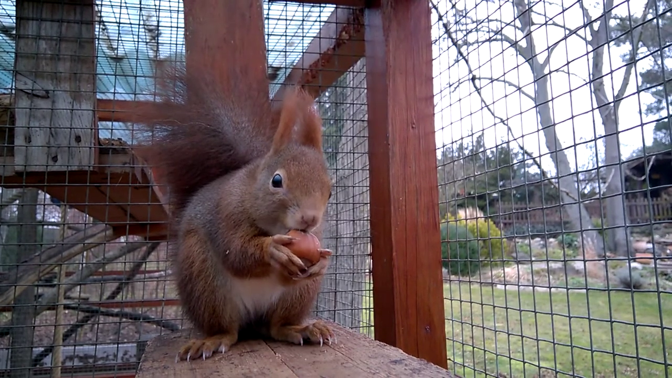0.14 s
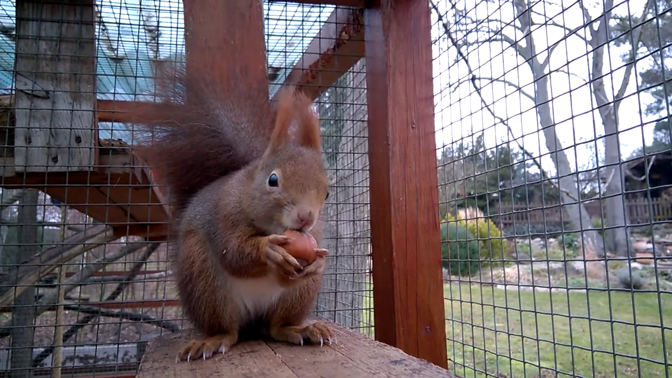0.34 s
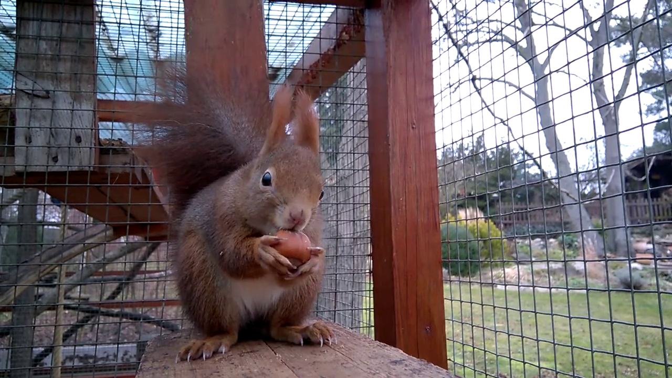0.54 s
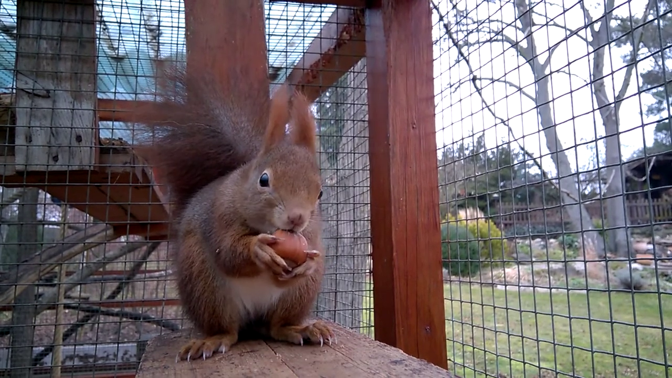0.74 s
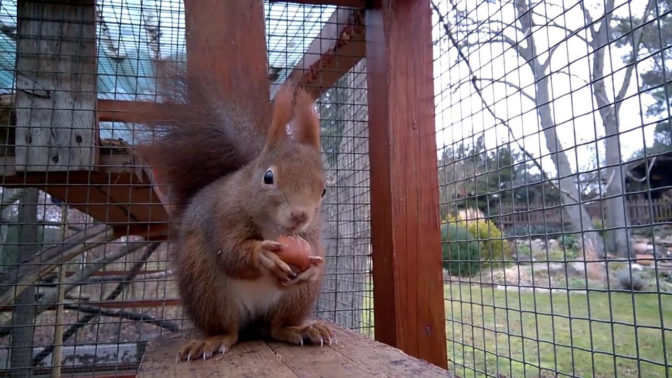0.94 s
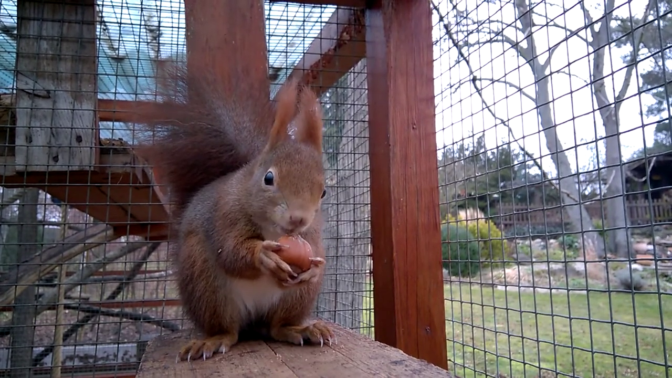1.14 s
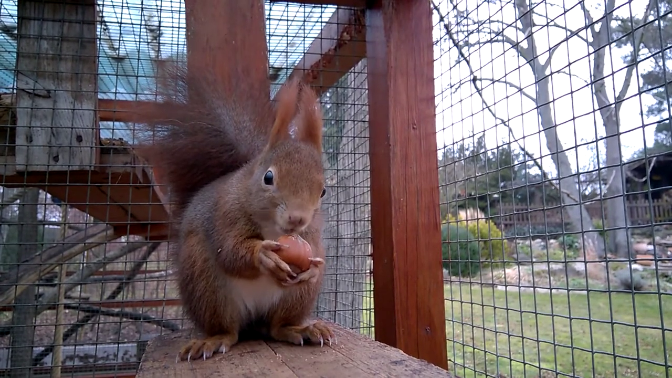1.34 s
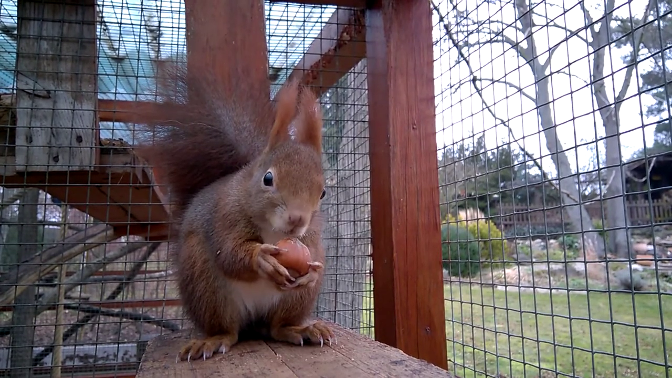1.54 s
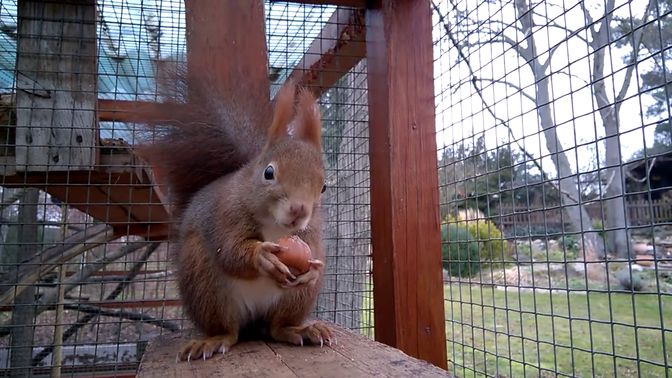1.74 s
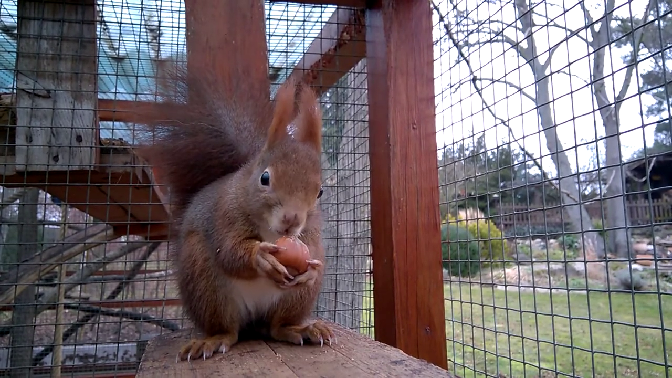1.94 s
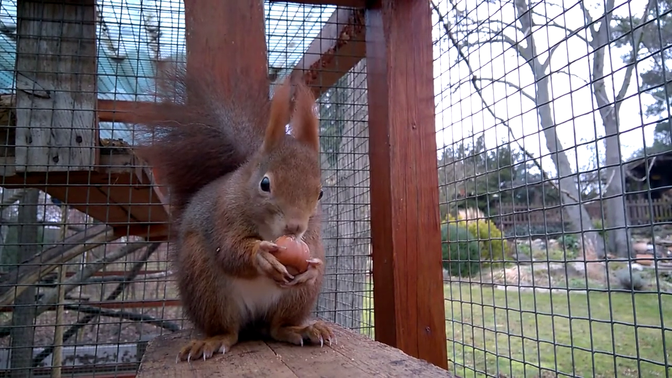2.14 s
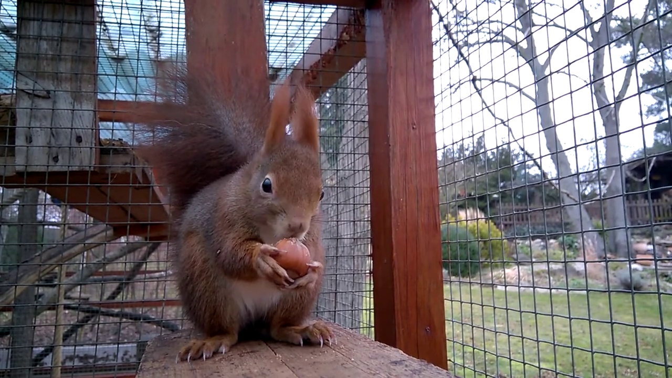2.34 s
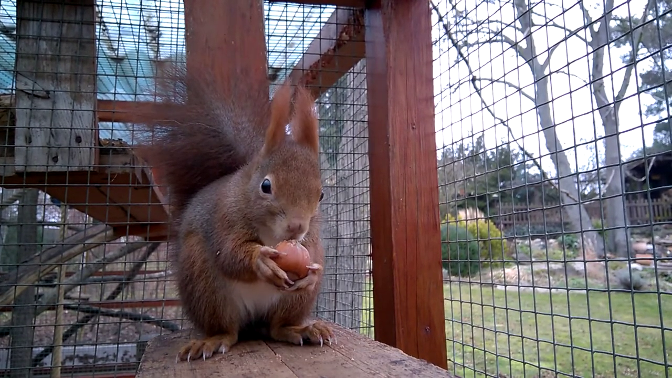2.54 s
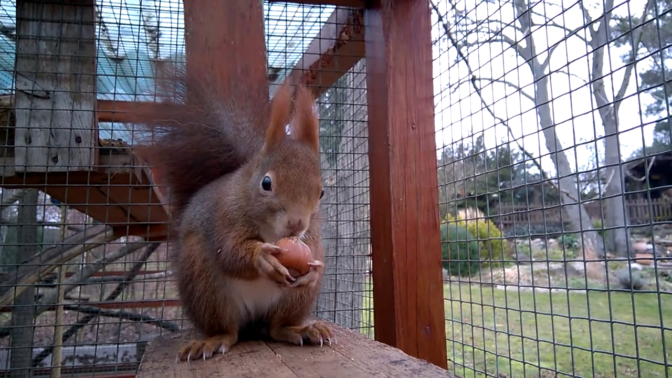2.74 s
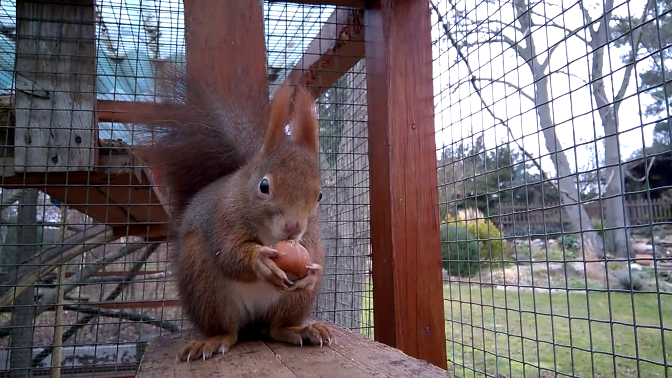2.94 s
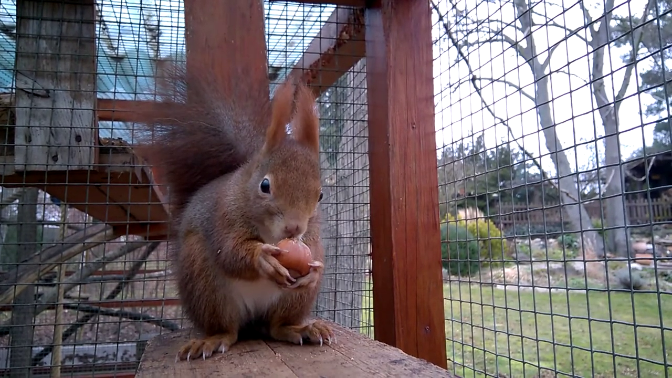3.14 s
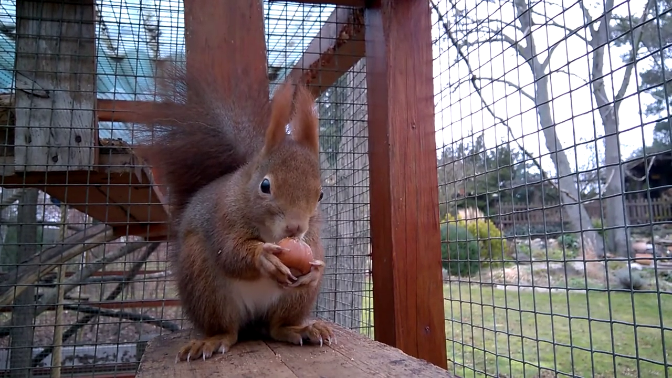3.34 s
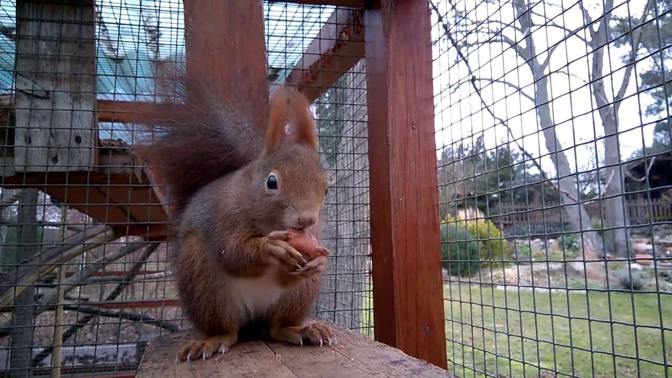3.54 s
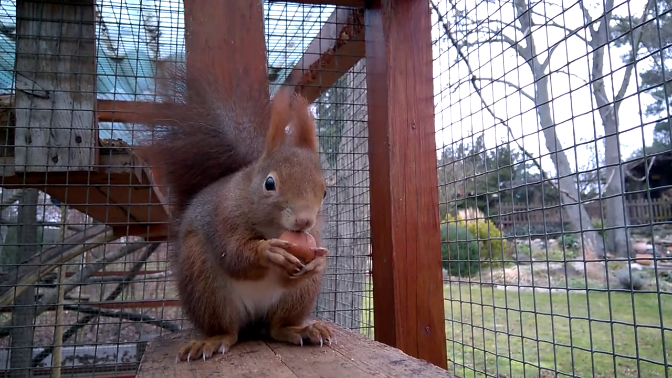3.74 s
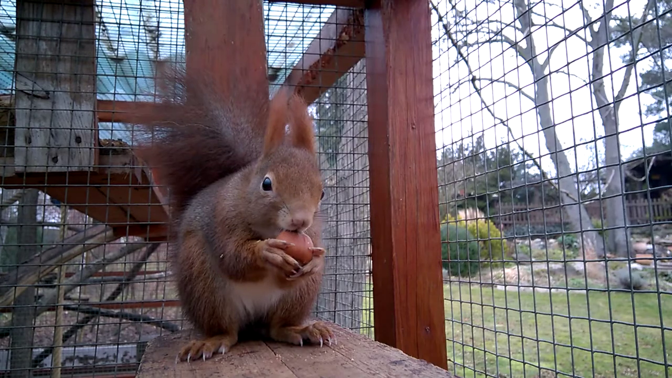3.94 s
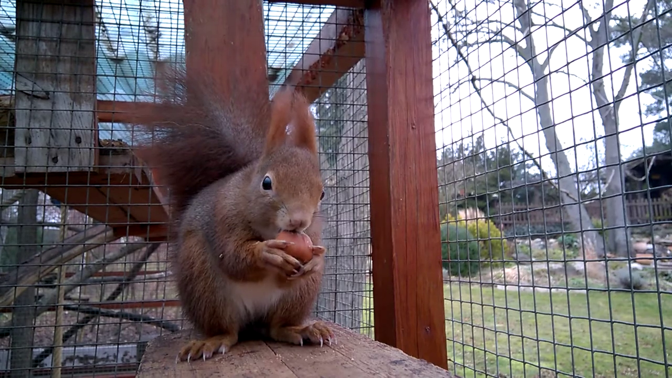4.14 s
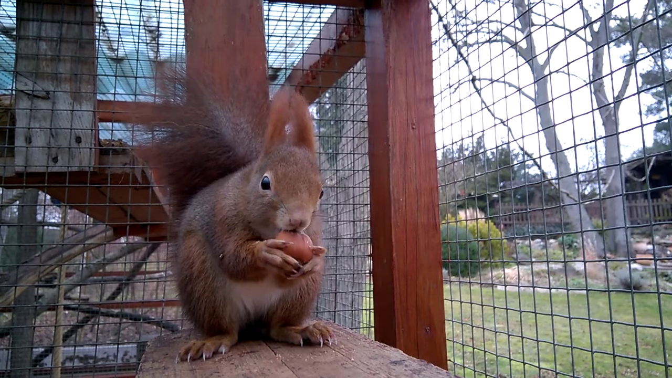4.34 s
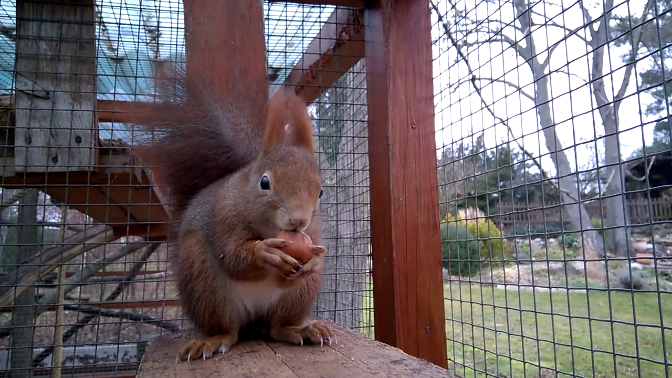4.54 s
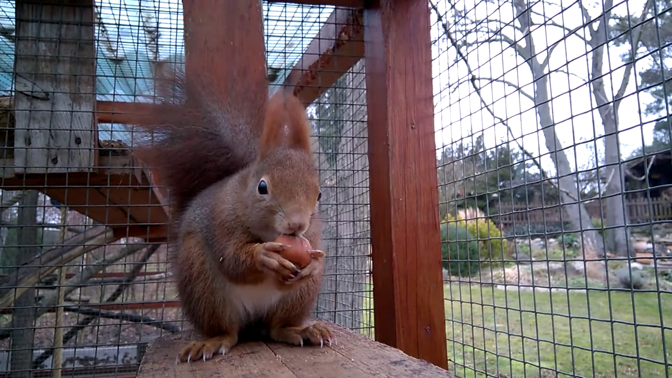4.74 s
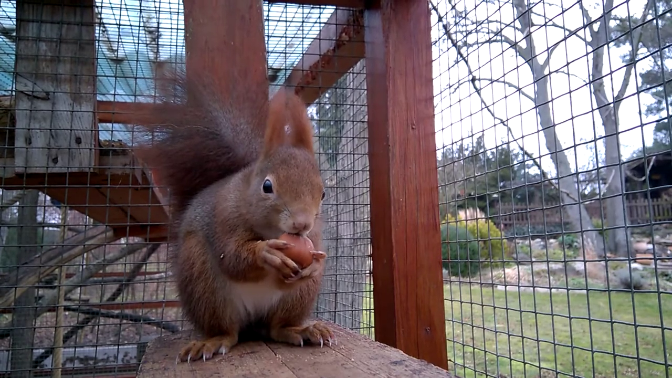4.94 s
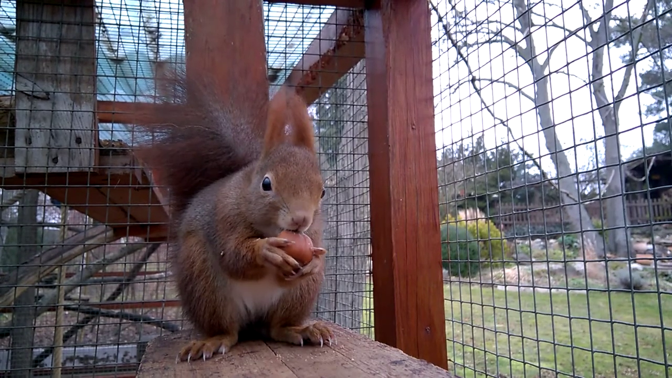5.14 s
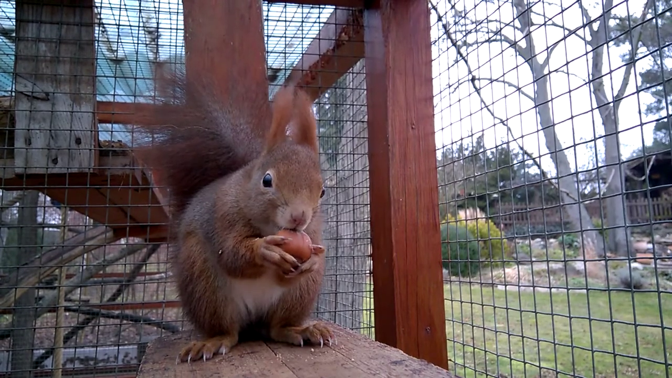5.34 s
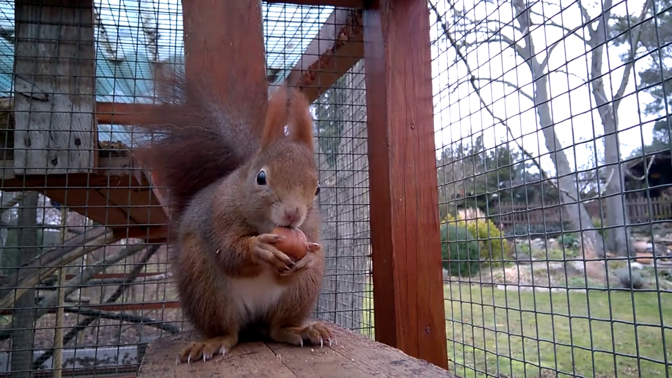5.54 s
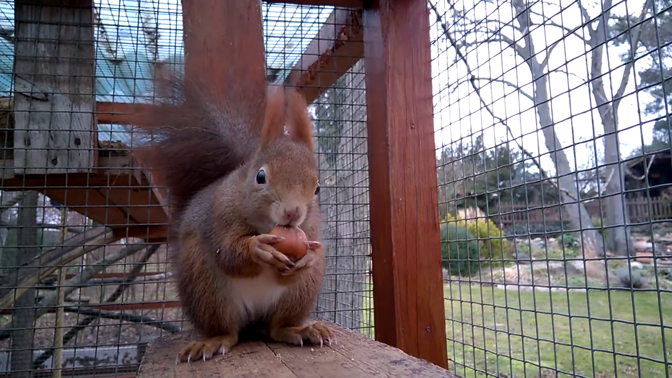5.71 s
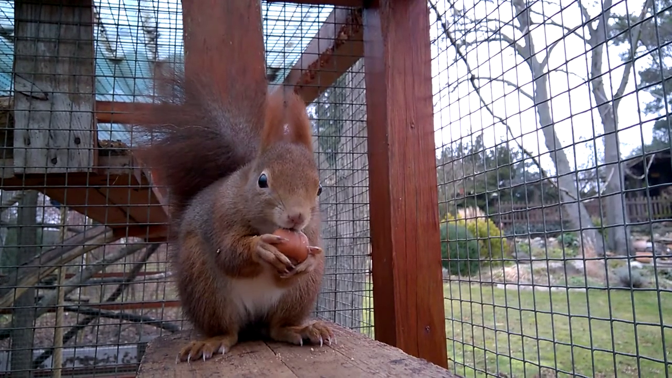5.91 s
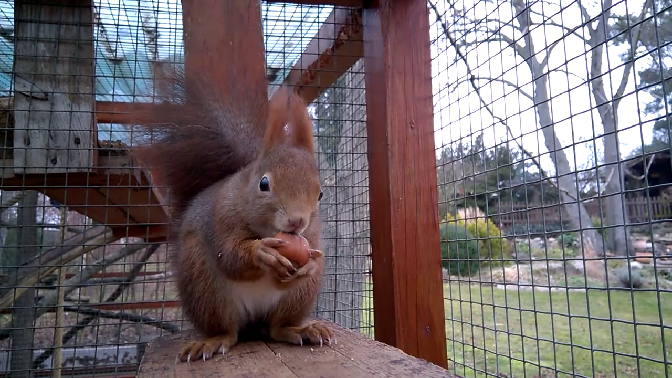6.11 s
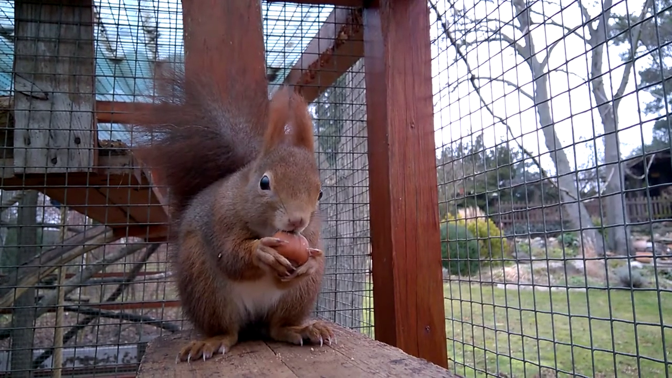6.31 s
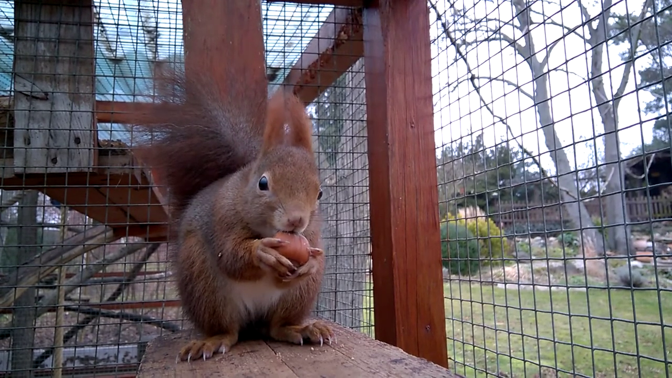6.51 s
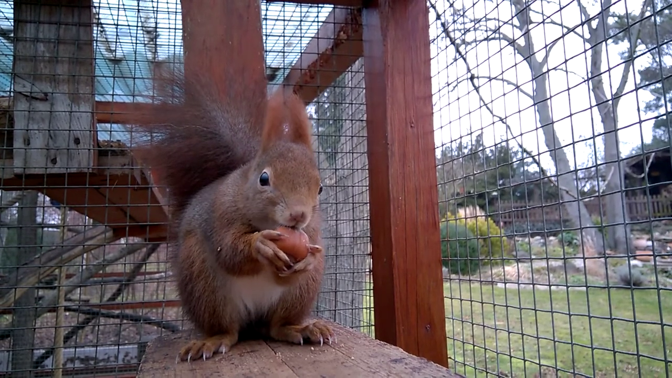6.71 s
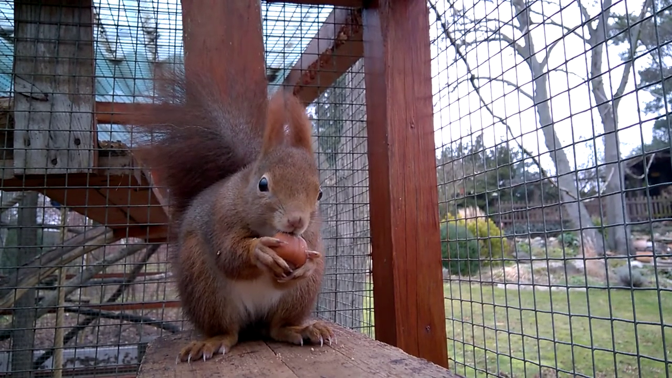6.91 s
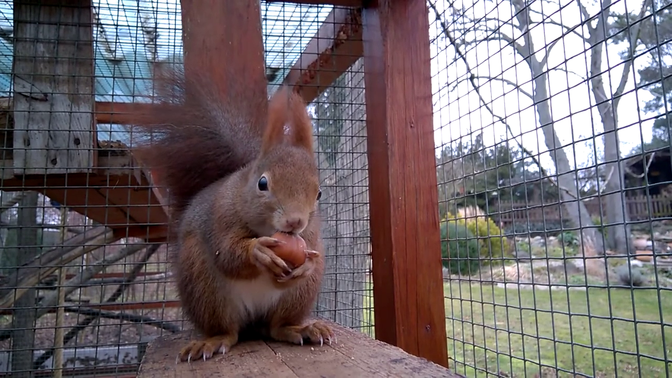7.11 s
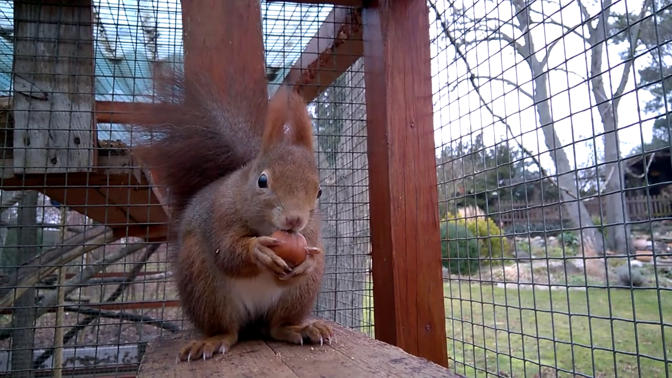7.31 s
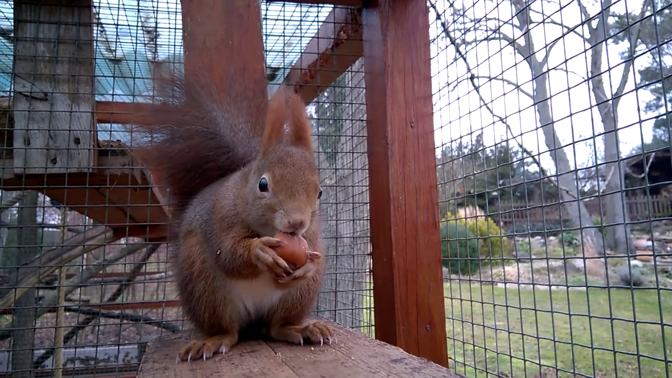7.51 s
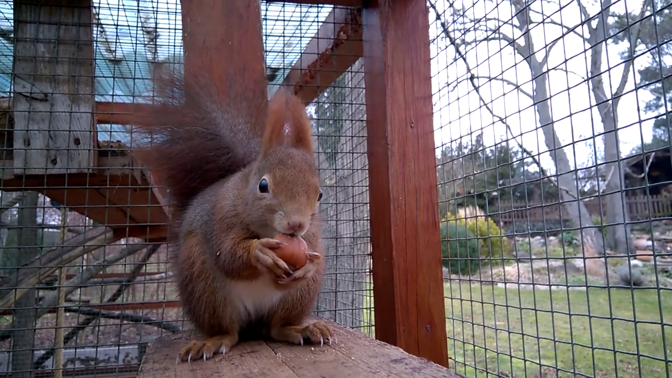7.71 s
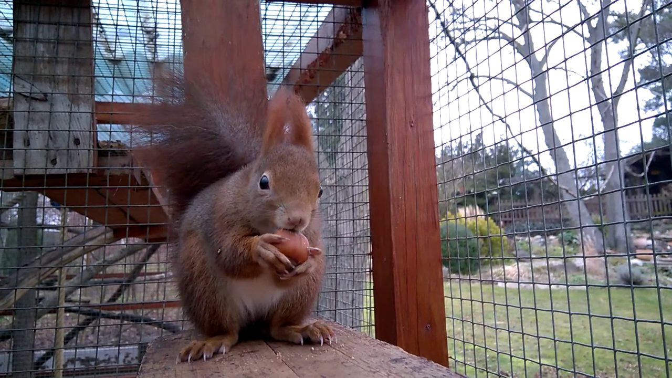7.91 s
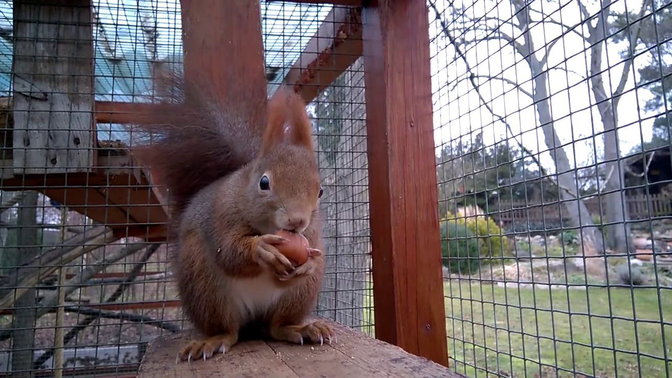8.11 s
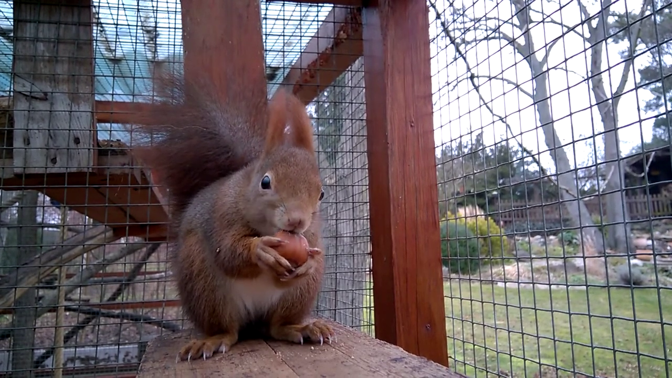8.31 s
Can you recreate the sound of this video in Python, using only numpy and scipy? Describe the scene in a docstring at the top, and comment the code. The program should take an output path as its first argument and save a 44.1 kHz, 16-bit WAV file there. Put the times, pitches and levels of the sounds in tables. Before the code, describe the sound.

A squirrel gnaws a hard nut close by, in bouts of quick scrapes and sharp clicks, over faint distant birds.

```python
"""A wire enclosure in a garden: a squirrel gnaws a hard nut close by, with one pause of three seconds.
Each stroke of the incisors is a rasp of tiny slips; chips snap off as it ends. Resonances colour every
scrape and snap with a short, hollow ring, strongest near 3 kHz; perch, posts and boards return echoes.
Small birds whistle far off, over a low outdoor rumble, a slowly swelling distant rush and faint hiss."""
import sys
import numpy as np
from scipy import signal
from scipy.fft import rfft, irfft, next_fast_len
from scipy.io import wavfile
from scipy.ndimage import uniform_filter1d, map_coordinates

SR = 44100
rng = np.random.default_rng(int(sys.argv[2]) if len(sys.argv) > 2 else 0)


def put_to_file(sound):
    """Save the sound as 16-bit audio at rate SR, in the file named by the first command-line argument."""
    columns = np.atleast_2d(sound).T  # one column per channel
    safe = np.clip(columns, -1, 1)
    whole_steps = np.round(safe * 32767)
    wavfile.write(sys.argv[1], SR, whole_steps.astype(np.int16))


N = 373082

# background levels: (time [s], rumble [dB], rush [dB])
OUTDOOR_LEVELS = [(0, -46, -63.5), (1.2, -48, -66), (1.8, -48.5, -63), (2.8, -47, -61), (5.4, -46, -59.5),
                  (6.05, -46, -56), (8.46, -45, -56)]
# background spectra: (frequency [Hz], relative density [dB])
RUMBLE_SPECTRUM = [(8.8, -23), (15, -0.5), (52, -2.5), (97, -9), (113, -18), (145, -17.5), (198, -21.5),
                   (265, -29.5), (300, -40.5), (390, -51), (660, -120)]
RUSH_SPECTRUM = [(120, -11), (280, -4), (400, 1), (600, -1), (1000, -5.5), (1400, -10.5), (2000, -21),
                 (4000, -43.5)]
HISS_SPECTRUM = [(500, 8.5), (1500, -7), (2500, -1.5), (3800, 1), (5000, -1.5), (6500, -5.5), (8000, -17.5),
                 (10000, -17), (12000, -13.5), (15500, -15)]
# falling bird whistles: (start [s], length [s], start pitch [Hz], fall [Hz/s], relative level [dB])
WHISTLES = [(0.368, 0.052, 6800, 8400, -61.5), (0.47, 0.079, 6700, 21100, -61),
            (1.105, .027, 3950, 2000, -70), (1.402, .066, 6000, 39800, -67), (1.6, 0.082, 6100, 34650, -68),
            (2.157, .057, 6300, 19000, -71), (2.24, .075, 8100, 12500, -76),
            (4.89, 0.091, 7200, 12000, -65), (5.066, 0.083, 6940, 7200, -57.5),
            (7.86, 0.059, 7600, 14000, -57), (8.038, .12, 7540, 8000, -63.5)]
# hoarse chirps and rustles: (start [s], length [s], centre [Hz], relative level [dB])
RUSTLES = [(1.19, 0.079, 3300, -68), (2.293, 0.084, 4760, -61), (2.449, .043, 5030, -67),
           (2.592, 0.054, 1920, -65.5), (3.115, 0.056, 3170, -63), (4.003, .068, 4800, -62),
           (4.092, 0.065, 4480, -58.5)]
# echoes off perch and posts: (delay [s], gain [dB])
ECHOES = [(.004, -27.5), (.0087, -20.5), (0.01, -28.5)]
# enclosure decay: (frequency [Hz], T60 [s])
TAIL_T60 = [(500, 0.21), (3000, .11), (7000, 0.15), (10000, 0.092), (14000, 0.064)]
# colour of the gnawing's diffuse tail: (frequency [Hz], relative gain [dB])
TAIL_COLOUR = [(1000, 1.5), (2400, 2), (3000, -3.5), (3700, 1.5), (5400, 2), (6500, -1.5), (10000, 12)]
# fixed resonances colouring every scrape and snap: (centre [Hz], half width [Hz], relative level [dB])
RESONANCES = [(803, 117, -26), (979, 71.6, -15), (1284, 160, -20.5), (1691, 133, -16.5), (1793, 180, -15),
              (2033, 50, -11.5), (2224, 162, -13), (2674, 100, -18.5), (2917, 77, -1.5), (2959, 89, -2.5),
              (3175, 234, -3), (3764, 300, -10.5), (4250, 110, -13.5), (4395, 257, -11), (4840, 59, -9.5),
              (5194, 158, -14), (5860, 195, -13.5), (6473, 168, -9), (6400, 85, -27.5), (7110, 106, -18),
              (7820, 554, -35.5), (8680, 250, -35), (8960, 140, -37), (9600, 280, -40), (10020, 220, -38),
              (10470, 220, -40.5), (10860, 220, -44.5), (11700, 2400, -53)]
# tone as the grip shifts: (time [s], depth [dB], scrape brightness [dB])
GRIP_TONE = [(.05, 3, 1), (.17, 2, -4.5), (.3, 5.5, -4), (.42, 5.5, 1.5), (.62, 6, 0.5), (.76, 0.5, -2),
             (3.55, 9, 3.5), (4.28, 8.5, 0), (4.7, 2, 0.5), (4.89, 3.5, -0.5), (5.03, 7.5, 3.5),
             (5.5, 11, 1), (5.72, 1.5, -4), (5.9, -0.5, -1.5), (6.15, 5.5, -1), (6.37, 3.5, -2.5),
             (6.8, 3, -1.5), (8.12, 2, -0.5), (8.3, 5.5, 0.5), (8.42, 2.5, -1)]
# low shelf for depth, high shelf for brightness: (frequency [Hz], weight [dB/dB])
DEPTH_SHELF = [(500, 1.26), (1000, 1.1), (1900, 1.0952), (2900, 0)]
BRIGHT_SHELF = [(3300, 0), (5500, 1), (9000, 1.38), (13000, 1.9)]
# incisor strokes, about eight a second: (start [s], length [s], relative level [dB])
STROKES = [(0.011, 0.075, -35), (0.146, 0.054, -31), (.271, 0.065, -31.5), (0.4, 0.049, -28),
           (0.519, .066, -29.5), (0.652, 0.05, -30), (3.535, 0.07, -65), (3.697, .056, -45),
           (3.813, 0.053, -43), (3.917, 0.06, -40.5), (4.042, 0.056, -37.5), (4.149, 0.047, -31),
           (4.248, 0.054, -31.5), (4.349, 0.062, -37), (4.467, 0.068, -33.5), (4.582, 0.063, -29.5),
           (4.713, 0.058, -29.5), (4.859, 0.057, -39), (4.98, 0.071, -39.5), (5.115, 0.064, -40),
           (5.239, 0.06, -43.5), (5.387, 0.047, -44.5), (5.504, 0.048, -38.5), (5.661, 0.091, -50),
           (5.808, 0.063, -52), (5.948, 0.056, -37.5), (6.086, 0.052, -34.5), (6.207, .047, -29),
           (6.314, .064, -30), (6.449, .063, -34), (6.599, .058, -47.5), (6.747, 0.035, -37),
           (6.859, 0.047, -37.5), (6.989, .05, -47), (7.375, 0.06, -52.5), (7.492, .045, -45),
           (7.63, 0.071, -38.5), (7.812, 0.069, -34), (7.938, 0.058, -32.5), (8.104, 0.062, -37.5),
           (8.253, 0.061, -36.5), (8.393, 0.072, -38)]
# chips breaking, teeth slipping off: (time [s], relative level [dB], brightness [dB], breaks [count])
SNAPS = [(0.054, -24, -1, 1), (0.191, -31, -10.5, 1), (.2044, -33, -3.5, 1), (.317, -27, -26, 1),
         (.446, -35.5, 7.5, 1), (0.556, -36, -4, 1), (0.584, -37, 2, 1), (0.678, -23, -5, 1),
         (0.7, -22, 1, 1), (.718, -20, -0.5, 2), (.7566, -26, 3.5, 1), (4.273, -22, 0.5, 1),
         (4.291, -35, 7, 1), (4.616, -18.5, -2.5, 2), (4.6461, -23, -2, 1), (4.745, -22, -10, 1),
         (4.755, -21.5, 2, 1), (4.799, -38.5, 2.5, 1), (4.884, -29, -0.5, 1), (5.156, -28.5, 6, 1),
         (5.168, -33.5, -8, 1), (5.268, -28.5, -5.5, 1), (5.297, -47, 7, 1), (5.544, -48, 9, 1),
         (5.6, -47, 1.5, 1), (5.706, -30, -2, 1), (5.7153, -18, 1.5, 1), (5.746, -22.5, -2.5, 1),
         (5.855, -21.5, -2.5, 2), (5.872, -20, 3, 1), (5.991, -36.5, 5, 1), (6.133, -31, 3.5, 2),
         (6.345, -25.5, -1, 1), (6.358, -21, -0.5, 1), (6.378, -25, 1.5, 1), (6.397, -30.5, -1, 1),
         (6.4642, -32, -8, 1), (6.486, -21.5, -4, 1), (6.496, -25, 4.5, 2), (6.542, -43.5, 2.5, 1),
         (6.644, -24, 1.5, 1), (6.656, -18, 2, 1), (6.703, -40.5, 3.5, 1), (6.7723, -28, -6, 2),
         (6.9061, -28.5, 5.5, 2), (6.927, -45, 11.5, 1), (7.011, -34, -5, 1), (7.022, -21.5, 3, 1),
         (7.0302, -22.5, 1, 2), (7.056, -42.5, 4.5, 1), (7.128, -44, 4, 1), (7.1392, -18, 0, 2),
         (7.187, -45.5, -3, 1), (7.2612, -31, -5.5, 1), (7.278, -38.5, -6, 1), (7.317, -42, -2, 1),
         (7.403, -22.5, -0.5, 2), (7.518, -33.5, 0, 1), (7.5286, -28, 5, 1), (7.534, -21, -2, 1),
         (7.684, -28.5, 0.5, 2), (7.703, -28, 3, 1), (7.741, -58, 11, 1), (7.872, -23, 0, 1),
         (7.9916, -32, 4.5, 1), (8.036, -31, 4.5, 1), (8.1433, -31.5, 7, 1), (8.152, -23.5, -.5, 1),
         (8.173, -19, 0, 2), (8.294, -37.5, 14, 1)]


def amp(db):
    return 10 ** (np.asarray(db) / 20)


def unit_rms(x):
    return x / np.sqrt(np.mean(x ** 2) + 1e-20)


def curve_at(points, hz):
    """Interpolate (frequency [Hz], value) points on a log axis."""
    point_hz, values = np.transpose(points)
    return np.interp(np.log(hz + 1), np.log(point_hz + 1), values)


def wobble(rate_hz):
    """Smooth random curve, rate_hz knots a second."""
    knots = rng.standard_normal(int(N * rate_hz / SR) + 4)
    return map_coordinates(knots, [np.arange(N) * rate_hz / SR])


def filtered(x, response):
    """Apply a complex frequency response."""
    size = next_fast_len(len(x) + 8192)
    return irfft(rfft(x, size) * response(np.fft.rfftfreq(size, 1 / SR)), size)[:len(x)]


def noise(spectrum, size):
    """Coloured noise, rms 1."""
    return unit_rms(filtered(rng.standard_normal(size), lambda hz: amp(curve_at(spectrum, hz))))


def add(track, start_s, sound):
    part = track[max(round(start_s * SR), 0):][:len(sound)]
    part += sound[:len(part)]


def outdoors(hiss_db=-68):
    """Lumpy rumble, slowly swelling distant rush, steady hiss."""
    times_s, *levels_db = np.transpose(OUTDOOR_LEVELS)
    rumble_db, rush_db = [np.interp(np.arange(N) / SR, times_s, db) for db in levels_db]
    rumble = amp(rumble_db + 0.87 * wobble(rate_hz=6)) * noise(RUMBLE_SPECTRUM, N)
    rush = amp(rush_db + 0.45 * wobble(rate_hz=4.9)) * noise(RUSH_SPECTRUM, N)
    return rumble + rush + amp(hiss_db) * noise(HISS_SPECTRUM, N)


def whistle(length_s, first_hz, last_hz, waver=0.011):
    """Short sine glide with trembling pitch."""
    size = int(length_s * SR)
    tremble = unit_rms(uniform_filter1d(rng.standard_normal(size), size=150))
    hz = np.linspace(first_hz, last_hz, size) * (1 + waver * tremble)
    return np.hanning(size) ** .5 * np.sqrt(2) * np.sin(2 * np.pi * np.cumsum(hz) / SR)


def birds(chirps=60, chirp_db=-76):
    """Thin falling whistles, faint random chirps, a few hoarse noise bursts."""
    out = np.zeros(N)
    for start_s, length_s, first_hz, fall_hz_per_s, db in WHISTLES:
        add(out, start_s, amp(db) * whistle(length_s, first_hz, first_hz - fall_hz_per_s * length_s))
    for when, length, octaves, bend in rng.random((chirps, 4)):
        first_hz = 3600 * 2 ** octaves
        chirp = whistle(0.015 + 0.043 * length, first_hz, first_hz * (0.72 + .25 * bend))
        add(out, when * N / SR, amp(chirp_db) * chirp)
    for start_s, length_s, hz, db in RUSTLES:
        size = int(length_s * SR)
        band = [(hz / 2, -25), (hz, 0), (hz * 1.31, -8), (hz * 2, -35)]
        add(out, start_s, amp(db) * np.hanning(size) ** .5 * noise(band, size))
    return out


def enclosure_tail(x, predelay_s=.003):
    """Diffuse return from posts and boards, changing as the animal moves."""
    out, block = np.zeros(N), SR // 4
    for i in range(0, N, block):
        hz, t, spectra = signal.stft(rng.standard_normal(block), SR, nperseg=128)
        decay = amp(-60 * t / curve_at(TAIL_T60, hz)[:, None])
        _, tail = signal.istft(spectra * decay, SR, nperseg=128)
        add(out, i / SR + predelay_s, signal.fftconvolve(x[i:i + block], tail / np.linalg.norm(tail)))
    return out


def early_echoes(x):
    """Direct sound plus reflections off perch and posts."""
    return filtered(x, lambda hz: 1 + sum(amp(db) * np.exp(-2j * np.pi * hz * s) for s, db in ECHOES))


def near_bounces(x, delay_s=.0016, feedback=0.41):
    """All-pass: bounces between near surfaces spread the sound in time and keep its colour."""
    lag = lambda hz: np.exp(-2j * np.pi * hz * delay_s)
    return filtered(x, lambda hz: (lag(hz) - feedback) / (1 - feedback * lag(hz)))


def hollow_ring(force, fft_size=2048, detune=0.011):
    """Short, hollow ring on every scrape and snap, strongest near 3 kHz; slight detuning per block."""
    out, block = np.zeros(N), SR // 8
    hz = np.fft.rfftfreq(fft_size, 1 / SR)
    causal_fold = 1 + np.sign(fft_size / 2 - np.arange(fft_size))
    for i in range(0, N, block):
        tunings = 1 + detune * rng.standard_normal(len(RESONANCES))
        power = sum(amp(db) ** 2 / (1 + ((hz - tuning * centre_hz) / width_hz) ** 2) ** 2
                    for tuning, (centre_hz, width_hz, db) in zip(tunings, RESONANCES))
        # minimum phase: the ring starts at full strength
        cepstrum = irfft(np.log(power) / 2) * causal_fold
        ring = irfft(np.exp(rfft(cepstrum)))
        add(out, i / SR, signal.fftconvolve(force[i:i + block], ring / np.linalg.norm(ring)))
    return out


def grip(time_s):
    """(depth [dB], brightness [dB]) that the grip gives the nut."""
    times_s, *tones_db = np.transpose(GRIP_TONE)
    return [np.interp(time_s, times_s, db) for db in tones_db]


def add_bite(track, start_s, force, depth_db, bright_db, spot_spread_db=1.5):
    """Mix in one bite, shelved low and high; each spot on the shell adds a random colour."""
    grid_hz = np.arange(0, SR, 400)
    spot_db = spot_spread_db * rng.standard_normal(len(grid_hz))

    def colour(hz):
        shelves_db = depth_db * curve_at(DEPTH_SHELF, hz) + bright_db * curve_at(BRIGHT_SHELF, hz)
        return amp(shelves_db + np.interp(hz, grid_hz, spot_db))

    pad_s = .001
    add(track, start_s - pad_s, filtered(np.pad(force, int(pad_s * SR)), colour))


def slips(size, rate_hz, scatter_db):
    """Stick-slip impulses of uneven spacing and strength, rms 1."""
    count = int(size * rate_hz / SR) + 1
    positions = ((np.arange(count) + rng.random(count)) * size / count).astype(int)
    strengths = amp(scatter_db * np.clip(rng.standard_normal(count), -2, 2))
    signs = rng.choice([-1, 1], count)
    return unit_rms(np.bincount(positions, strengths * signs, size))


def scraping(rise_s=.021, release_s=.017, edge_db=-22, build_db=1, catch_db=1.5, mid_stroke_db=-37.5):
    """Force of incisors dragging over the shell: a fine rasp, with coarser catches and jumps."""
    force = np.zeros(N)
    for start_s, length_s, db in STROKES:
        t = np.arange(int(length_s * SR)) / SR
        slack = np.maximum(1 - np.minimum(t / rise_s, (length_s - t) / release_s), 0)
        pressure = amp(db + edge_db * slack + build_db * (t / length_s - .5))
        depth_db, bright_db = grip(start_s + length_s / 2)
        bright_db -= .1 * (db - mid_stroke_db)  # harder is duller
        rasp = slips(len(t), rate_hz=1300, scatter_db=5)
        catches = amp(catch_db) * slips(len(t), rate_hz=220, scatter_db=1.5)
        add_bite(force, start_s, pressure * unit_rms(rasp + catches), depth_db, bright_db)
    return force


def snapping(crack_db=20.5, splinter_db=-6.5, splinter_decay_s=.0021,
             mean_gap_s=.005, step_loss_db=1.6, mid_snap_db=-30.5):
    """Force of chips giving way in one or two breaks, each a sharp release and a trail of splinters."""
    force, t = np.zeros(N), np.arange(SR // 100) / SR
    release = t == 0
    for start_s, db, bright_db, breaks in SNAPS:
        depth_db = grip(start_s)[0] - 4.5 - 0.45 * (db - mid_snap_db)  # louder is thinner
        gap_s = mean_gap_s * (1 + 0.0992 * rng.standard_normal())
        for k in range(round(breaks)):
            trail = slips(len(t), rate_hz=2500, scatter_db=3.5) * np.exp(-t / splinter_decay_s) * (t > 0)
            splinters = amp(splinter_db) * trail / np.linalg.norm(trail)
            crack = amp(db + crack_db - k * step_loss_db) * (release + splinters)
            add_bite(force, start_s + k * gap_s, crack, depth_db, bright_db)
    return force


def scene():
    """Close gnawing with echoes and diffuse tail, far birds, garden background."""
    gnawing = hollow_ring(scraping() + snapping())
    gnawing = early_echoes(near_bounces(gnawing))
    tail = filtered(enclosure_tail(gnawing), lambda hz: amp(curve_at(TAIL_COLOUR, hz) - 22))
    calls = birds()
    far_birds = amp(-1.5) * calls + amp(-7.5) * enclosure_tail(calls)
    return (outdoors() + far_birds + tail + gnawing)[None]


def record(dry):
    """Brick-wall low-pass."""
    cutoff_hz = 15870
    return filtered(dry[0], lambda hz: hz < cutoff_hz)[None]


dry = scene()
out = record(dry)
put_to_file(out)
```